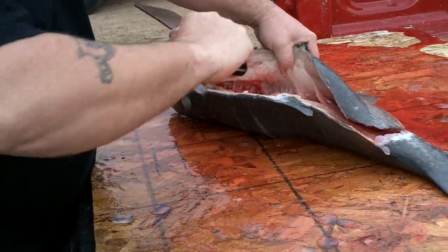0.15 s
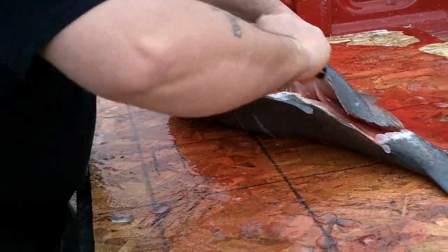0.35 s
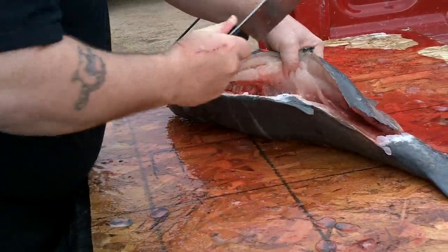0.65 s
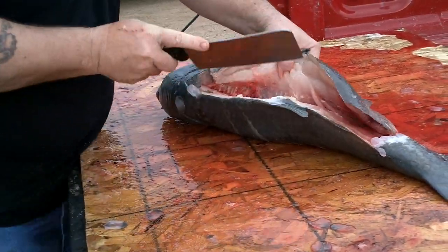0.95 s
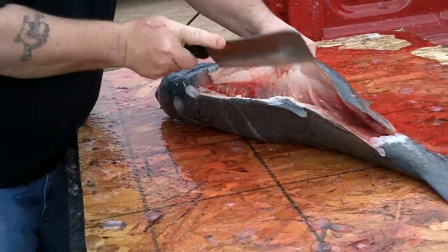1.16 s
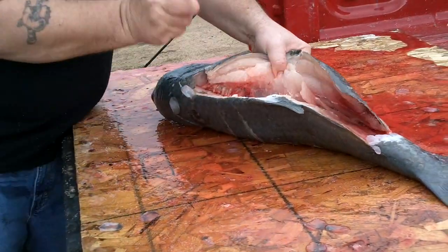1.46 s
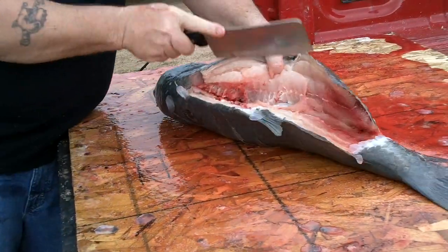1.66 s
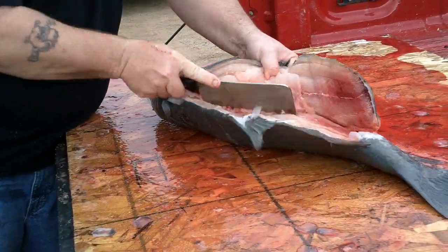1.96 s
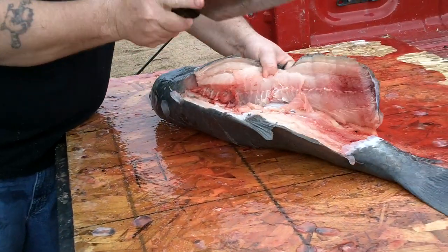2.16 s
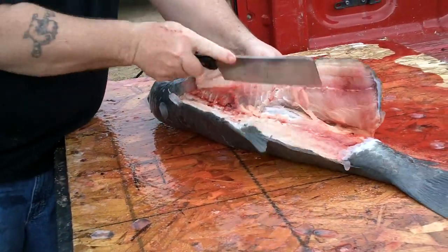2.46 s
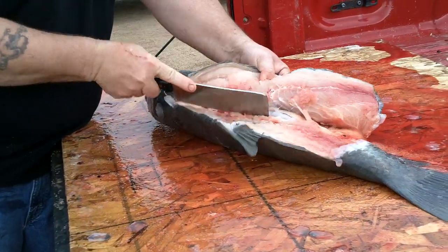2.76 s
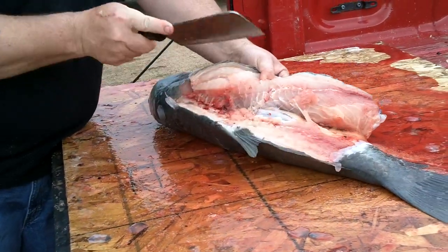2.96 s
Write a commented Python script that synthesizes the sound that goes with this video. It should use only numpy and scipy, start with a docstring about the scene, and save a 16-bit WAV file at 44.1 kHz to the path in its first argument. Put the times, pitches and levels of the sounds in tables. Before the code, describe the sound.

Cleaver chops through a large fish on a wet plywood table outdoors. Until 1.7 s only faint wet ticks, a low car hum with tyre roar, and a soft airy swish near 1.3. Then four dry, splintery bone cracks at about 1.7, 2.1, 2.5 (weaker) and 2.9 s, each with brief blade ring, board knock, table shudder and wet crunch. The car sinks in pitch and fades over distant rumble; close, near-mono microphone.

```python
"""Outdoors a cleaver chops four times through the bones of a big fish on a wet plywood table.
Bone snaps are short damped tones with splinter noise; blade and board ring as decaying modes.
The table shudders and thumps in dense filtered knocks and low tones; wet flesh ticks in noise bursts.
Behind, a car drives away along a road: a hum of engine orders sinking in pitch, tyre roar fading.
Noise swells (low tyre roar, a whoosh, swishes) and distant rumble lie underneath; the microphone colours all."""
import sys
import numpy as np
from scipy import signal
from scipy.fft import rfft, irfft
from scipy.io import wavfile
from scipy.ndimage import uniform_filter1d

SR = 44100
rng = np.random.default_rng(int(sys.argv[2]) if len(sys.argv) > 2 else 0)


def pcm_store(signal):
    """Save signal as 16-bit PCM."""
    levels = np.round(np.clip(np.atleast_2d(signal), -1, 1) * 32767)
    wavfile.write(sys.argv[1], SR, levels.astype(np.int16).T)


def natural_amplitude(level_db):
    """Convert a level in decibels to a linear amplitude factor, elementwise."""
    exponent = np.asarray(level_db, float) / 20
    return 10 ** exponent


N = 136710


def level(x, db):
    """Set the rms level."""
    return x * natural_amplitude(db) / np.sqrt(np.mean(x ** 2))


def shape(table, hz):
    """Interpolate a (frequency [Hz], level [dB]) table, falling away outside its ends."""
    f, db = np.array(table).T
    log_hz = np.log(np.maximum(hz, 1))
    below = np.maximum(np.log(f[0]) - log_hz, 0)
    above = np.maximum(log_hz - np.log(f[-1]), 0)
    return np.interp(log_hz, np.log(f), db) - 25 * (below + above)


def colour(x, table):
    """Filter by a (frequency [Hz], level [dB]) table, then set the rms to 1."""
    hz = np.arange(N // 2 + 1) * SR / N
    return level(irfft(rfft(x) * natural_amplitude(shape(table, hz)), N), 0)


def walk(rate):
    """Wander at random: values held for 1 / rate seconds, then slewed twice."""
    hold = int(SR / rate)
    steps = np.repeat(rng.standard_normal(N // hold + 1), hold)
    return 1.474 * uniform_filter1d(uniform_filter1d(steps, hold), hold)[:N]


def decay(t60, t):
    """Exponential fall of 60 dB in t60 seconds."""
    return np.exp(-np.log(1000) * t / t60)


def ring(hz, t60, t):
    """A decaying mode."""
    return np.sin(2 * np.pi * hz * t) * decay(t60, t)


def add(out, s, x):
    """Mix x in at s seconds."""
    i = int(s * SR)
    out[i:i + len(x)] += x[:N - i]


# blade modes rung by every snap: (frequency [Hz], level [dB], t60 [s])
BLADE_MODES = [(1645, -14.5, .012), (4895, -2.5, 0.011), (6000, -5, 0.005), (9600, -25, .012),
               (10430, -12, 0.018), (14500, -9, .01)]
# bone snaps, in four chops:
# (time [s], level [dB], ring of the piece [Hz], damping by flesh [s], blade re snap [dB])
BONE_SNAPS = [(1.6908, -14.5, 3780, 0.00067, -10.5), (1.6928, -5, 3285, 0.001, -2.5),
              (1.6953, -6, 3270, 0.0021, -8.5), (1.7113, -27.5, 3200, 0.0015, -5),
              (2.0994, -8.5, 3610, 0.00073, -1.5), (2.1025, -16, 5770, 0.00057, 5),
              (2.1029, -11, 2900, 0.00058, -16.5), (2.5081, -21, 4000, 0.0012, -6),
              (2.5091, -22.5, 3180, 0.0011, -2), (2.5113, -15, 3550, 0.00052, 1.5),
              (2.5147, -18, 3480, 0.00067, 4.5), (2.516, -29, 5620, 0.0013, -7.5),
              (2.8771, -20.5, 4500, 0.00067, -1), (2.8792, -6.5, 3500, 0.00036, -14.5),
              (2.8791, -2, 3360, .0005, -8), (2.8798, -7.5, 3640, .0006, -4.5),
              (2.8820, -18.5, 3000, 0.00068, -16.5), (2.8885, -31, 4900, 0.0013, -12)]


def bone_snaps():
    """Each snap rings its piece of bone until flesh damps it, rings the blade and sprays splinters."""
    splinter_db, splinter_t60_s = -6.5, 0.029
    out, t = np.zeros(N), np.arange(int(.15 * SR)) / SR
    blade = np.zeros(len(t))
    for k, (hz, db, t60) in enumerate(BLADE_MODES):
        blade += (-1) ** k * natural_amplitude(db) * ring(hz, t60, t)  # neighbouring modes start in opposite phase
    for s, db, hz, damp_s, blade_db in BONE_SNAPS:
        bright_noise = np.diff(rng.standard_normal(len(t) + 1))
        splinters = natural_amplitude(splinter_db) * bright_noise * decay(splinter_t60_s, t)
        bone = np.sin(2 * np.pi * hz * t) * np.exp(-(t / damp_s) ** 2 / 2)
        add(out, s, natural_amplitude(db) * (bone + natural_amplitude(blade_db) * (blade + splinters)))
    return out


# board modes rung by every blow: (frequency [Hz], relative level [dB], t60 [s])
BOARD_MODES = [(64, 0.5, .12), (190, -5, 0.08), (263, -2, 0.014), (450, 7, 0.0083), (710, 1.5, 0.034),
               (980, 7, .015)]
# blows on the board: (time [s], push level [dB], contact [s], knock of the spot [Hz], knock level [dB])
BOARD_BLOWS = [(1.6922, -17, 0.00076, 450, -18), (2.0989, -15.5, .0008, 270, -10.5),
               (2.5073, -26.5, 0.00075, 302, -15.5), (2.5092, -35, 0.00053, 980, -12.5),
               (2.5116, -26, 0.0012, 890, -19), (2.8770, -20, .0004, 490, -18),
               (2.8825, -28, 0.0025, 130, -26)]


def board_blows():
    """Each blow pushes the board's modes for its contact time and knocks at the spot it hits."""
    knock_t60_s = 0.018
    out, t = np.zeros(N), np.arange(int(.15 * SR)) / SR
    board = sum(natural_amplitude(db) * ring(hz, t60, t) for hz, db, t60 in BOARD_MODES) / 2
    for s, db, contact_s, hz, knock_db in BOARD_BLOWS:
        push = np.hanning(int(contact_s * SR) + 3)
        pushed_board = np.convolve(board, push / push.sum())[:len(t)]  # a longer contact dulls the ring
        knock = natural_amplitude(knock_db) * ring(hz, knock_t60_s, t)
        add(out, s, natural_amplitude(db) * pushed_board + knock)
    return out


# colour of the shuddering table: (frequency [Hz], density [dB per Hz])
SHUDDER_COLOUR = [(25, -30.5), (60, 4.5), (110, -3), (180, -0.5), (350, -5.5), (600, -12), (1000, -16),
                  (2000, -24.5)]
# colour of the crunching flesh: (frequency [Hz], density [dB per Hz])
CRUNCH_COLOUR = [(600, -1.5), (1500, -1), (3000, -0.5), (5000, -2), (8000, -18.5), (15000, -11)]
# one shudder per chop: (time [s], rise [s], hold [s], fall t60 [s], level [dB], flesh crunch level [dB])
TABLE_SHUDDERS = [(1.684, 0.039, 0.067, 0.21, -32, -39), (2.104, .03, 0.041, 0.24, -27, -39.5),
                  (2.512, 0.016, 0.023, 0.41, -31, -36), (2.882, 0.021, 0.026, 0.26, -24.5, -36.5)]


def shudder(t):
    """Dense random knocks of table and fish swell with each chop; flesh crunches as gritty noise."""
    knocks_per_s, crunch_t60_s = 2500, 0.18
    knocks = (rng.random(N) < knocks_per_s / SR) * rng.standard_normal(N)
    grain_db = 3.0 * rng.exponential(size=N // 40 + 1).repeat(40)[:N]  # a new level every 40 samples
    grit = rng.standard_normal(N) * natural_amplitude(grain_db)
    rumble, crunch = colour(knocks, SHUDDER_COLOUR), colour(grit, CRUNCH_COLOUR)
    out = np.zeros(N)
    for s, rise, hold, t60, db, crunch_db in TABLE_SHUDDERS:
        u = np.maximum(t - s, 0)
        swell = np.minimum(u / rise, 1) * decay(t60, np.maximum(u - rise - hold, 0))
        fade = (u > 0) * decay(crunch_t60_s, np.maximum(u - rise, 0))
        out += natural_amplitude(db) * swell * rumble + natural_amplitude(crunch_db) * fade * crunch
    return out


# dull thumps of the table: (time [s], level before the soft onset [dB], frequency [Hz], t60 [s])
TABLE_THUMPS = [(1.75, -13, 170, 0.033), (2.146, -12.5, 190, 0.042), (2.329, -3.5, 79.5, 0.035),
                (2.339, -14.5, 174, .025), (2.528, -28, 70, .06), (2.904, -13, 160, .03),
                (2.921, -17, 190, 0.059), (2.963, -8, 52, 0.1)]


def thumps():
    """Single low modes of the table stand out, each with a soft onset."""
    out, t = np.zeros(N), np.arange(SR // 5) / SR
    for s, db, hz, t60 in TABLE_THUMPS:
        onset = 1 - np.exp(-t * hz * 2)
        add(out, s, natural_amplitude(db) * ring(hz, t60, t) * onset)
    return out


# wet ticks: (time [s], noise rms before the envelope [dB], length [s], centre [Hz], width [octaves])
WET_TICKS = [(.028, -37, .002, 8000, 0.84), (0.057, -41.5, .002, 7900, 1.7), (.105, -45, .006, 8000, 1.3),
             (0.144, -50.5, .002, 6000, 0.56), (0.263, -42, 0.0046, 7940, 4.5),
             (.372, -56, 0.0025, 11000, 0.45), (.845, -53.5, .003, 11000, .8),
             (1.184, -50, .002, 5000, 0.8), (1.765, -38, .004, 3320, 0.75), (1.771, -42, .002, 3500, 2.5),
             (1.778, -35, .004, 8000, 2.4), (1.795, -32, .003, 7100, 3.9), (1.802, -38.5, .003, 3300, 1.1),
             (2.161, -47, .002, 5000, 0.94), (2.168, -32.5, .004, 1850, 0.56),
             (2.188, -33.5, .005, 6000, 4), (2.209, -34, .002, 5040, 6.3), (2.536, -48, .003, 8000, 1.1),
             (2.55, -53, .003, 5000, 1.8), (2.591, -45, .004, 7000, 1.6), (2.600, -46, .004, 9000, 1.1),
             (2.607, -41, .002, 3500, 1.8), (2.936, -49, .002, 7000, 1.8)]


def ticks():
    """Short bursts of band-passed noise: wet flesh parting."""
    out, t = np.zeros(N), np.arange(SR // 20) / SR
    for s, db, length, hz, octaves in WET_TICKS:
        edges = np.minimum(hz * 2 ** (np.array([-octaves, octaves]) / 2), SR / 2.2)
        band = signal.butter(2, edges, "band", fs=SR, output="sos")
        noise = level(signal.sosfilt(band, rng.standard_normal(len(t))), db)
        burst = (t / length) * np.exp(1 - t / length) ** 2
        add(out, s - length, noise * burst)  # begins one length ahead of its listed time
    return out


# engine orders: (multiple of the firing rate, level [dB], waver [dB])
ENGINE_ORDERS = [(1, -5.5, 1.5), (2, -0.5, 1.3), (3, -33, 4), (3.5, -19, 1.5), (4, -1, 3), (5, -22.5, 2.5)]
# tyre roar: (frequency [Hz], density [dB per Hz])
TYRE_COLOUR = [(150, -25), (300, -5), (480, -4), (620, -10), (950, -1), (1300, 2.5), (2000, -8),
               (3200, -13), (5000, -20), (8000, -33.5), (15000, -31.5)]
# the car behind:
# (time [s], firing rate [Hz], hum level [dB], added to fourth order [dB], tyre roar level [dB])
CAR_COURSE = [(0, 67.74, -39, -9, -42.5), (.2, 67.13, -33.5, -21, -44), (.45, 66.86, -34.5, -17.5, -42.5),
              (.8, 66.6, -37.5, -6, -46), (1.1, 65.96, -36.5, -10, -45.5), (1.35, 65.06, -38, -7.5, -46),
              (1.7, 65.3, -37, -8.5, -46), (2.05, 64.4, -37.5, -10, -47.5), (2.298, 62.5, -42, -6, -49.5),
              (2.65, 61.78, -48.5, -7, -54), (3.1, 61.3, -47, -3, -58)]


def car(t):
    """Engine orders that waver around a sinking firing rate, and tyre roar that flickers."""
    s, hz, hum_db, fourth_db, roar_db = np.array(CAR_COURSE).T
    firing_hz = np.interp(t, s, hz) * (1 + 0.00381 * walk(6.49))
    phase = 2 * np.pi * np.cumsum(firing_hz) / SR
    hum = np.zeros(N)
    for multiple, db, waver_db in ENGINE_ORDERS:
        order_db = db + waver_db * walk(9)
        if multiple == 4:
            order_db = order_db + np.interp(t, s, fourth_db)
        hum += natural_amplitude(order_db) * np.sin(multiple * phase + 2 * np.pi * rng.random())
    hum *= np.sqrt(2)  # order levels become rms
    roar = colour(rng.standard_normal(N), TYRE_COLOUR) * natural_amplitude(0.5 * walk(13.78))
    return hum * natural_amplitude(np.interp(t, s, hum_db)) + roar * natural_amplitude(np.interp(t, s, roar_db))


# low tyre roar early on, then a broad whoosh and higher swishes:
# (time of the peak [s], width [s], level [dB], centre [Hz], level an octave off [dB])
NOISE_SWELLS = [(.1, 0.28, -52, 375, -10.5), (1.249, 0.12, -56.5, 4450, -6),
                (1.275, 0.058, -44, 3000, -20.5), (1.36, 0.22, -49, 1627, -22)]


def noise_swells(t):
    """Bands of noise that swell and fade while their level flickers."""
    out = np.zeros(N)
    for s, width, db, hz, fall_db in NOISE_SWELLS:
        noise = colour(rng.standard_normal(N), [(hz / 2, fall_db), (hz, 0), (hz * 2, fall_db)])
        swell = np.exp(-((t - s) / width) ** 2 / 2)
        out += noise * natural_amplitude(db + 1.5 * walk(29.74)) * swell
    return out


# distant outdoor rumble: (frequency [Hz], density [dB per Hz])
AIR_COLOUR = [(15, -6), (30, 5), (55, -4.5), (100, -9), (200, -8.5), (350, -20.5), (800, -30),
              (2500, -32.5), (6000, -49.5), (15000, -42.5)]


def outdoor_air():
    """Distant rumble: coloured noise whose level wanders slowly."""
    return colour(rng.standard_normal(N), AIR_COLOUR) * natural_amplitude(-42.5 + 1.23 * walk(3.77))


def scene():
    """All sources, heard from one spot by two equal channels."""
    t = np.arange(N) / SR
    chops = bone_snaps() + board_blows() + shudder(t) + thumps() + ticks()
    background = car(t) + noise_swells(t) + outdoor_air()
    mono = chops + background
    return np.array([mono, mono])


def roll_off(x):
    """The treble ends steeply here."""
    return signal.sosfilt(signal.butter(12, 16640, fs=SR, output="sos"), x)


# microphone colour: (frequency [Hz], gain [dB])
MIC_COLOUR = [(15, -3), (35, 2), (3600, 1), (4050, -3.5), (4230, -21.5), (4450, 0.5), (4900, 0), (6000, -3),
              (7200, -11), (8000, -21.5), (8900, -20), (9600, -9), (11500, -9), (12700, -19),
              (13500, -15.5), (15200, -21), (16500, -40)]


def record(dry):
    """The microphone housing colours the sound (causal response); the left port hears slightly late."""
    left_lag_s = 2.3e-5
    log_gain = shape(MIC_COLOUR, np.arange(1025) * SR / 2048) * np.log(10) / 20
    # folding the cepstrum onto positive times makes the response minimum-phase
    cepstrum = irfft(log_gain)
    cepstrum[1:1024] *= 2
    cepstrum[1025:] = 0
    response = irfft(np.exp(rfft(cepstrum)))[:1024]
    gain = rfft(response, N)
    hz = np.arange(N // 2 + 1) * SR / N
    lag = np.exp(-2j * np.pi * hz * np.array([[left_lag_s], [0]]))
    mix = irfft(rfft(dry) * gain * lag, N)
    return roll_off(mix)


dry = scene()
out = record(dry)
pcm_store(out)
```